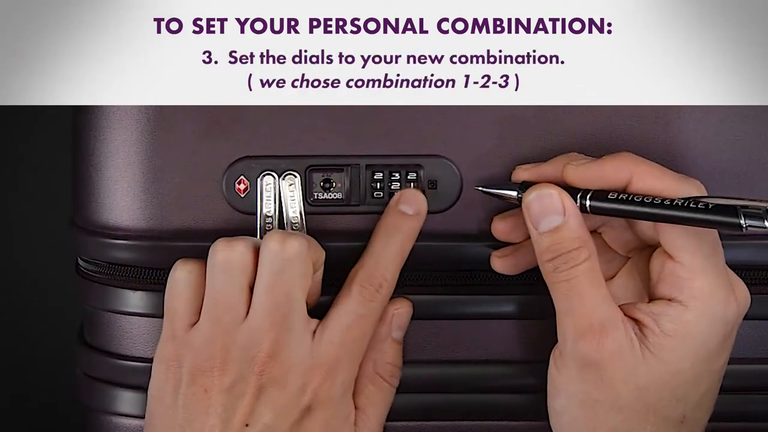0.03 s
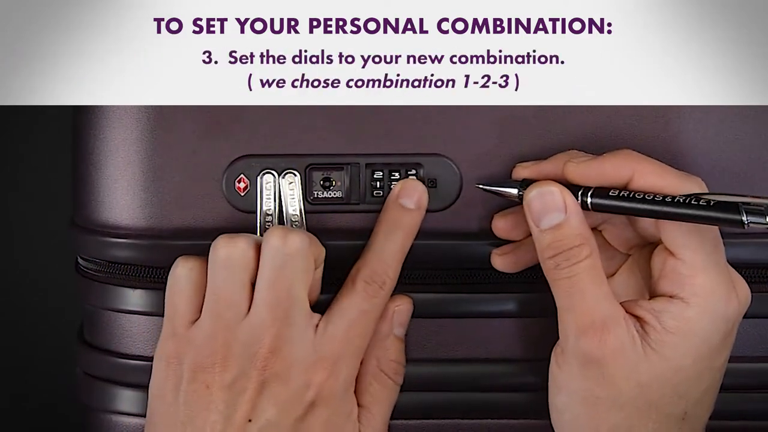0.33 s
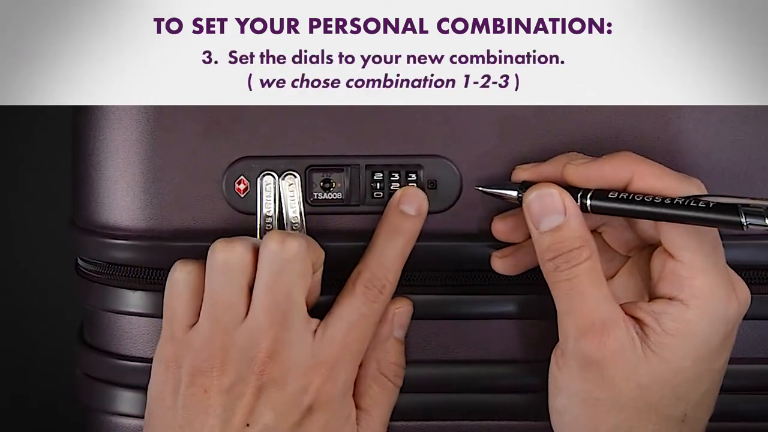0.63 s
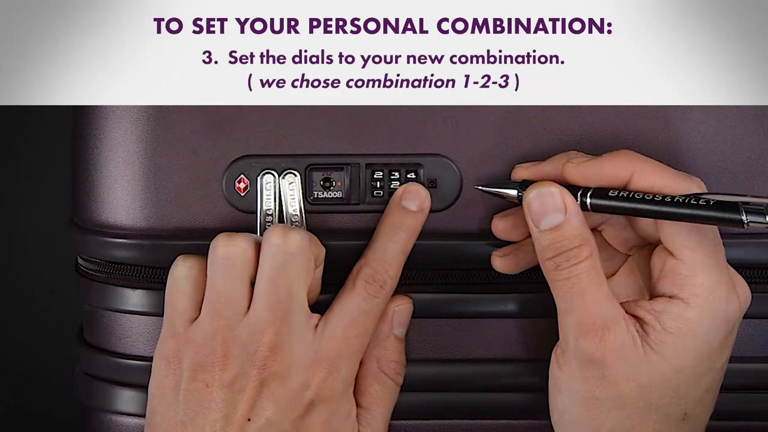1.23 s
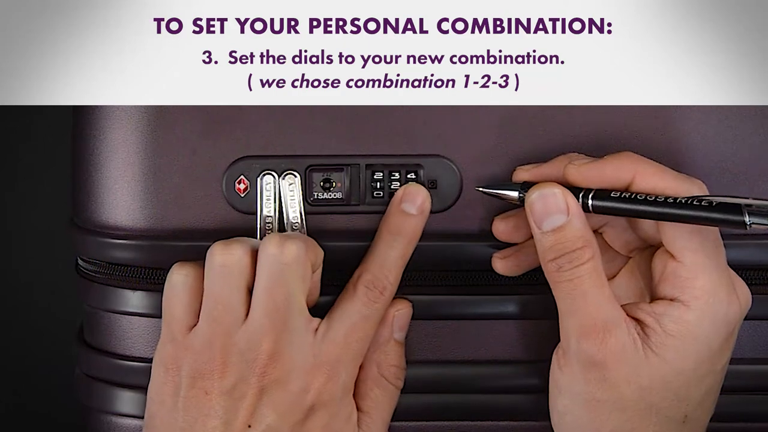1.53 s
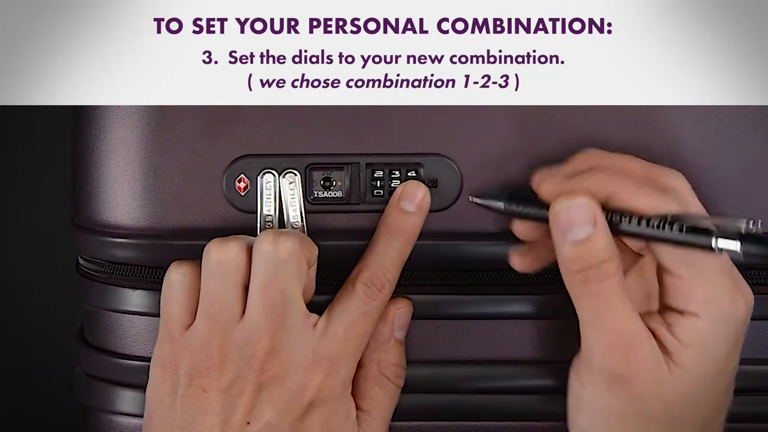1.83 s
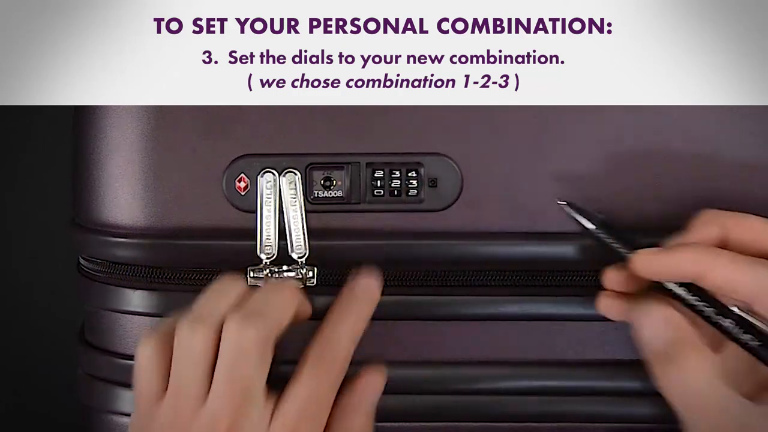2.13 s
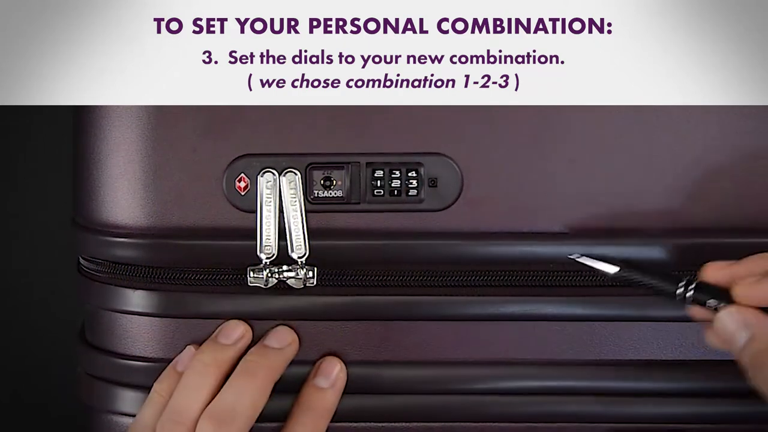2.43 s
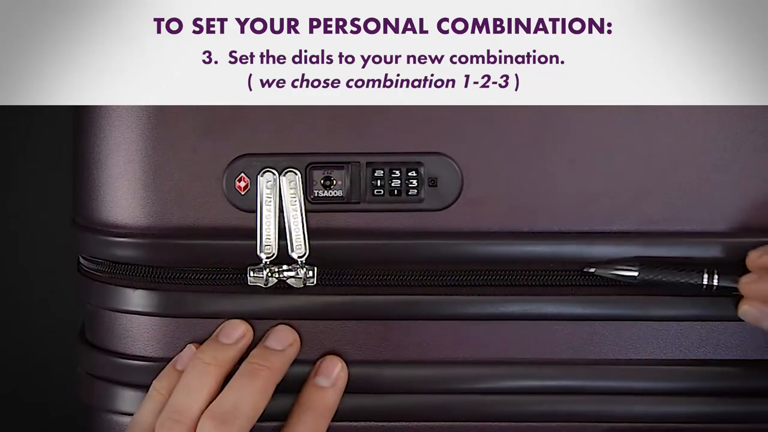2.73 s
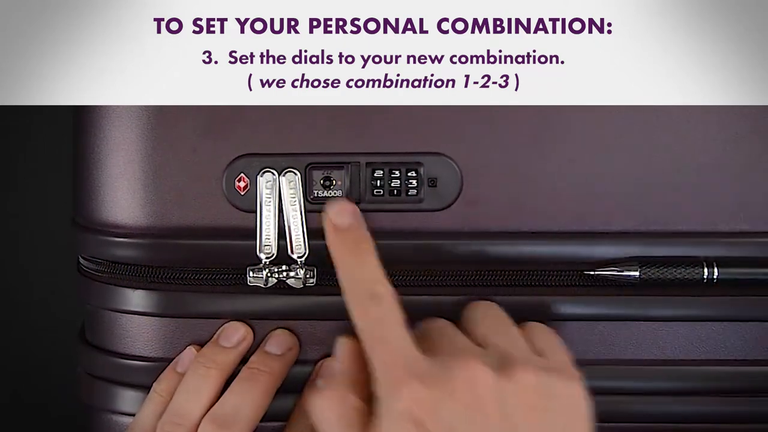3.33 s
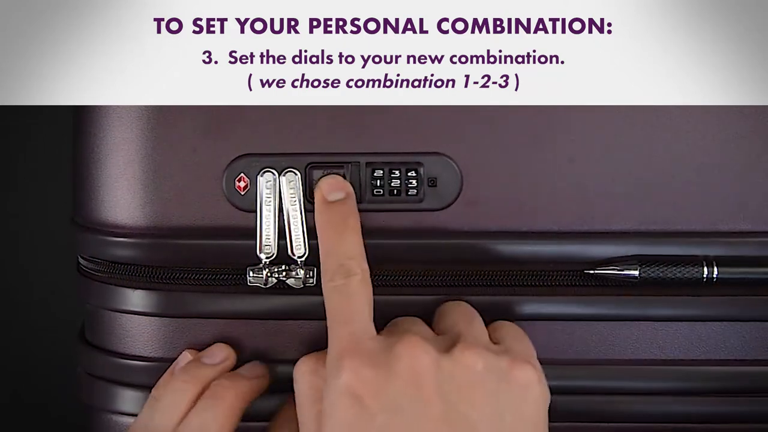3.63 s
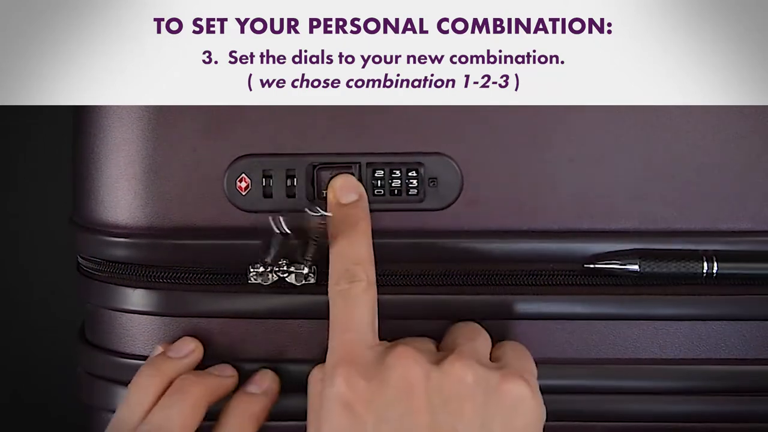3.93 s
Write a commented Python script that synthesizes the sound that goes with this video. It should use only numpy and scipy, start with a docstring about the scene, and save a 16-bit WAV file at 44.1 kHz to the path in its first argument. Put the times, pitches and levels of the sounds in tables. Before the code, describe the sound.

A suitcase lock's loud clack is the main sound, heard close in a small room. First a combination dial clicks lightly at about 0.5 and 1.2 seconds. Fingers brush the shell around 2 seconds. From 2.5 to 3 seconds, zip pulls tick and a pen lands with a soft hollow thump. Near 3.9 seconds the button snaps in a quick double clack with a brief spring rattle, over faint ventilation hum.

```python
"""Two small clicks, close in a small room: a finger turns a suitcase's combination dial two notches.
Skin brushes off the hard shell, zip pulls tick, and a pen is laid on the hollow case, which thumps.
Then the lock button is pressed: button and bolt hit their stops in a loud double clack and a spring rattles.
Faint ventilation noise and mains hum lie underneath."""
import sys
import numpy as np
from scipy import signal
from scipy.fft import rfft, irfft
from scipy.io import wavfile

SR = 44100
rng = np.random.default_rng(int(sys.argv[2]) if len(sys.argv) > 2 else 0)


def waveform_to_disk(signal):
    """Save audio, clipped to [-1, 1], as 16-bit WAV at the path in sys.argv[1]."""
    frames = np.transpose(np.atleast_2d(signal))
    scaled = np.clip(frames, -1, 1) * 32767
    samples = np.round(scaled).astype(np.int16)
    wavfile.write(sys.argv[1], SR, samples)


N = 176400
T = np.arange(N) / SR

# button and bolt impacts (time [s], level [dB], rise [s], t60 [s], bass [dB], treble [dB])
CLACKS = [(3.849, 1.5, 0.00201, 0.0099, -3, -9), (3.8516, 18, 0.00227, 0.031, -0.5, 0),
          (3.8678, -6, 0.00092, 0.048, 9, 0), (3.8839, 18, 0.00086, 0.055, 0.5, 7.5)]
# lock contact spectrum (frequency [Hz], gain [dB])
CLACK_COLOUR = [(60, -52), (130, -39), (200, -6.5), (320, -11.5), (430, -3.5), (600, -11), (900, 3),
                (1350, 3), (2200, -1.5), (3000, 0.5), (4500, -2.5), (5800, 0.5), (7600, -10), (9000, -17),
                (13000, -30), (16000, -47)]
# housing and panel modes (frequency [Hz], level [dB], t60 [s])
HOUSING_MODES = [(190, -64, 0.57), (842, -56, 0.26), (935, -54.5, 0.6), (1054, -50, 0.18),
                 (1370, -36, 0.017), (1944, -35, 0.029), (2660, -39, 0.045), (2860, -32.5, 0.019)]
# button and well modes (frequency [Hz], level [dB], t60 [s])
BUTTON_MODES = [(420, -27.5, .11), (1407, -17, 0.054), (1847, -20, 0.058), (3080, -16, 0.045)]
# bolt modes (frequency [Hz], level [dB], t60 [s])
BOLT_MODES = [(5420, -18, 0.024), (6020, -13, 0.025)]

def button():
    """The button slides in and snaps against its stop; the bolt follows and seats."""
    slide_s, stop_s, seat_s, slide_db = 3.82, 3.8525, 3.888, -47
    out = np.zeros(N)
    push = np.linspace(0, 1, int((CLACKS[0][0] - slide_s) * SR))
    friction = push * rng.standard_normal(len(push))
    add(out, slide_s, amp(slide_db) * colour(friction, CLACK_COLOUR))
    for at, db, rise_s, t60_s, bass_db, treble_db in CLACKS:
        contact = colour(crack(rise_s, t60_s), CLACK_COLOUR)
        tilt = [(550, bass_db), (900, 0), (4000, 0), (11000, treble_db)]
        add(out, at, amp(db) * colour(contact, tilt))
        add(out, at + rise_s, amp(db) * ring(HOUSING_MODES))
    add(out, stop_s, ring(BUTTON_MODES))
    add(out, seat_s, ring(BOLT_MODES))
    return out


# spring contacts (time [s], level [dB])
RATTLES = [(3.885, 4), (3.8928, -9), (3.9001, 3.5), (3.9046, 2.5), (3.931, -4.5)]
# spring modes (frequency [Hz], level [dB], t60 [s])
SPRING_MODES = [(7610, -34, 0.036), (7716, -20.5, 0.037), (11120, -26.5, 0.015), (14900, -26.5, 0.044)]

def spring():
    """The released spring rattles, ringing at each contact."""
    out = np.zeros(N)
    for at, db in RATTLES:
        ringing = ring(SPRING_MODES, scatter=0.0069)
        chatter = amp(-8) * colour(crack(rise_s=0.00035, t60_s=0.05), CLACK_COLOUR)
        add(out, at, amp(db) * (ringing + chatter))
    return out


# dial notches (time [s], snap level [dB], body level [dB], lift lead [s])
NOTCHES = [(0.4542, 1, -54.5, .0024), (1.2214, 3.5, -45, .0015)]
# hollow dial modes (frequency [Hz], level [dB], t60 [s])
DIAL_MODES = [(1360, 5.5, 0.019), (2100, 1.5, .009)]
# detent spectrum (frequency [Hz], gain [dB])
DETENT_COLOUR = [(300, -50), (1000, -27.5), (2700, -24), (3650, -28), (4000, -15), (4600, -9), (5100, -1.5),
                 (5600, -4), (6100, -15), (7400, -25), (8100, -43), (12000, -57)]

def dial():
    """The detent lifts, snaps into the next notch and chatters; the hollow dial knocks with it."""
    settle_lag_s = 0.001217
    drag_s, drag_width_s, drag_db = 1.935, 0.04, -47.5
    snaps, body = np.zeros(N), np.zeros(N)
    for at, db, body_db, lead_s in NOTCHES:
        add(snaps, at - lead_s, amp(db - 9) * crack(rise_s=0.00013, t60_s=0.0047))
        add(snaps, at, amp(db) * np.ones(1))
        add(snaps, at + settle_lag_s, amp(db - 8.5) * crack(rise_s=0.0003, t60_s=0.016))
        add(body, at - lead_s, amp(body_db) * ring(DIAL_MODES, scatter=0.01))
    # finger drags on the wheel without turning it
    drag = amp(drag_db) * np.exp(-((T - drag_s) / drag_width_s) ** 2) * rng.standard_normal(N)
    return colour(snaps + drag, DETENT_COLOUR) + body


# pen touches, lands, settles (time [s], level [dB], treble [dB])
PEN_HITS = [(2.7102, -28.5, -15), (2.8926, -6.5, 2), (2.9134, -15.5, -9), (3.0167, -24.5, -6.5)]
# pen contact spectrum (frequency [Hz], gain [dB])
PEN_COLOUR = [(100, 11), (400, -4), (1100, 4), (2000, -0.5), (3200, 0), (5500, -3.5), (6800, -4.5),
              (7800, -12), (10000, -12.5), (15500, -25)]
# modes of pen and shell beneath (frequency [Hz], level [dB], t60 [s])
PEN_MODES = [(1210, -39, 0.013), (1670, -32, 0.023), (5330, -31, 0.0086), (9950, -53, 0.038)]

def pen():
    """The pen barrel cracks against the shell and its clip rings; softer touches are duller."""
    out = np.zeros(N)
    for at, db, treble_db in PEN_HITS:
        hit = colour(strike(grit_db=0, t60_s=0.022), PEN_COLOUR) + ring(PEN_MODES)
        add(out, at, amp(db) * colour(hit, [(1200, 0), (9000, treble_db)]))
    return out


# soft blows on the shell (time [s], level [dB], pitch [ratio])
THUMPS = [(2.526, -39, 0.79), (2.553, -40, 0.82), (2.583, -47, 0.95), (2.737, -49.5, .95), (2.892, -29, 1),
          (2.919, -31.5, 1.1), (3.017, -43, 1.3)]
# shell modes at pitch 1 (frequency [Hz], level [dB], t60 [s])
SHELL_MODES = [(82.8, -13.5, 0.54), (98, -7.5, 0.21), (156.6, 1, 0.13), (185, 2, 0.065), (262.6, -8.5, 0.2),
               (328, -15, 0.17)]

def shell():
    """The hollow case booms under hand or pen; gentle blows barely reach its upper modes."""
    dulling_db_per_db = 0.86
    hardest_db = max(db for at, db, pitch in THUMPS)
    out = np.zeros(N)
    for at, db, pitch in THUMPS:
        tilt = [(170, 0), (300, dulling_db_per_db * (db - hardest_db))]
        add(out, at, -amp(db) * colour(ring(SHELL_MODES, pitch), tilt))
    return colour(out, [(55, -21), (85, -2.5), (280, -2), (600, -22), (3000, -46)])


# zip pull and pen ticks (time [s], level [dB], centre [Hz], width [exponent])
TICKS = [(2.5239, -14.5, 6100, 1.28), (2.6507, -16, 5570, 1.06), (2.6653, -26, 6000, 0.83),
         (2.7163, -41, 14100, 0.77), (2.7203, -13.5, 5770, 0.83), (2.931, -18, 6400, .8),
         (3.0157, -24.5, 5640, 0.56)]
# tick spectrum at width 1 (frequency / centre [ratio], gain [dB])
TICK_COLOUR = [(.1, -21), (.76, -10), (.88, 4), (1, 3), (1.13, 0), (1.3, -14.5), (2.7, -48)]

def metal_ticks():
    """Small metal parts touch: a sharp contact and brief grind through a bright resonance."""
    out = np.zeros(N)
    for at, db, centre_hz, width in TICKS:
        resonance = [(centre_hz * ratio ** width, gain_db) for ratio, gain_db in TICK_COLOUR]
        add(out, at, amp(db) * colour(strike(grit_db=-2.5, t60_s=0.017), resonance))
    return out


# fingertip brushes (time [s], level [dB], resonance [Hz])
BRUSHES = [(1.7831, -38.5, 4500), (1.914, -29.5, 5400), (1.9583, -36, 3400), (2.0348, -34.5, 3520),
           (2.051, -24.5, 5800), (2.0625, -20, 3020)]
# brush spectrum (frequency [Hz], gain [dB])
BRUSH_COLOUR = [(800, -4.5), (1300, 10), (2200, -5), (3100, 5), (5900, 4.5), (7500, -9), (15000, -41)]
# skin rub envelope (time [s], level [dB])
RUB_LEVELS = [(1.75, -78), (1.79, -67.5), (1.87, -70), (2.01, -64.5), (2.15, -69.5), (2.3, -65.5),
              (2.45, -75), (2.7, -64.5), (2.85, -75)]
# skin rub spectrum (frequency [Hz], gain [dB])
RUB_COLOUR = [(300, 6), (1400, -3.5), (3050, -4.5), (5800, -2.5), (7200, -11), (14000, -35)]

def fingers():
    """Skin rubs the shell and flicks the dials; each spot has its own plastic resonance."""
    peak_db, width_ratio = 6.5, 1.21
    grain_db, grain_samples = 2.3, 100
    flicks = np.zeros(N)
    for at, db, hz in BRUSHES:
        resonance = [(hz / width_ratio, 0), (hz, peak_db), (hz * width_ratio, 0)]
        add(flicks, at, amp(db) * colour(crack(rise_s=0.0002, t60_s=0.029), resonance))
    noise = rng.standard_normal(N)
    roughness_db = grain_db * np.repeat(rng.standard_normal(N // grain_samples + 1), grain_samples)[:N]
    rub = unit(colour(noise * amp(roughness_db), RUB_COLOUR)) * np.sqrt(N)
    rub_db = np.interp(T, *np.array(RUB_LEVELS).T, left=-120, right=-120)
    return colour(flicks, BRUSH_COLOUR) + amp(rub_db) * rub


# ventilation spectrum (frequency [Hz], gain [dB])
AIR_COLOUR = [(25, -37), (45, -21.5), (90, -9), (120, -7.5), (145, -16), (230, -8), (520, -9), (1100, -13),
              (2000, -19.5), (3100, -25.5), (4000, -25.5), (6900, -30.5), (7500, -36), (15500, -39.5)]

def background():
    """Steady ventilation noise and mains hum."""
    air_db, hum_db, hum_hz = -61.5, -68.5, 120
    air = unit(colour(rng.standard_normal(N), AIR_COLOUR)) * np.sqrt(N)
    hum = np.sqrt(2) * np.sin(2 * np.pi * hum_hz * T)
    return amp(air_db) * air + amp(hum_db) * hum


# echo spectrum (frequency [Hz], gain [dB])
ECHO_COLOUR = [(60, -5.5), (200, 7.5), (1000, -0.5), (3000, -2), (7000, -4.5), (10000, -5), (15000, -16.5)]

def diffuse_echo(t60_s, treble_t60_s):
    """Impulse response of an enclosed space: dense reflections build, then decay in two bands."""
    split_hz, gap_s, build_s = 5000, 0.0009, 0.011
    low = butter(rng.standard_normal(SR // 2), 2, split_hz, "low") * fade(t60_s)
    high = butter(rng.standard_normal(SR // 2), 2, split_hz, "high") * fade(treble_t60_s)
    build = np.clip((T[:SR // 2] - gap_s) / build_s, 0, 1)
    return colour(unit(build * (low + high)), ECHO_COLOUR)


def placed(x, echo, wet_db):
    """Direct sound plus its echo."""
    return x + amp(wet_db) * signal.fftconvolve(x, echo)[:N]


def strike(grit_db, t60_s):
    """One hard contact followed by a burst of finer ones."""
    x = amp(grit_db) * crack(0.00047, t60_s)
    x[0] += 1
    return x


def crack(rise_s, t60_s):
    """A dense, spectrally even burst of tiny contacts that builds and dies away."""
    t = T[:SR // 2]
    envelope = np.minimum(t / rise_s, 1) * np.exp(-np.log(1000) * np.maximum(t - rise_s, 0) / t60_s)
    spectrum = rfft(rng.standard_normal(len(t)) * envelope)
    whitened = irfft(spectrum / (abs(spectrum) + 1e-12), len(t))
    return unit(whitened * np.sqrt(envelope))


def ring(modes, pitch=1, scatter=0):
    """Damped modes after one blow; scatter detunes each at random."""
    detunes = 1 + scatter * rng.standard_normal(len(modes))
    return sum(amp(db) * fade(t60_s) * np.sin(2 * np.pi * hz * pitch * detune * T[:SR // 2])
               for (hz, db, t60_s), detune in zip(modes, detunes))


def fade(t60_s):
    """Half a second of exponential decay."""
    return np.exp(-np.log(1000) * T[:SR // 2] / t60_s)


def colour(x, points, size=4096):
    """Minimum-phase filter through (frequency [Hz], gain [dB]) points."""
    hz, db = np.array(points).T
    bin_hz = np.arange(size // 2 + 1) * SR / size
    gain = amp(np.interp(np.log(bin_hz + 1), np.log(hz), db))
    cepstrum = irfft(np.log(gain))
    cepstrum[1:size // 2] *= 2
    cepstrum[size // 2 + 1:] = 0
    response = irfft(np.exp(rfft(cepstrum)))
    return signal.fftconvolve(x, response)[:len(x)]


def butter(x, order, hz, kind):
    """Low- or high-pass filter."""
    return signal.sosfilt(signal.butter(order, hz, kind, fs=SR, output="sos"), x)


def amp(db):
    """Decibels to gain."""
    return 10 ** (np.asarray(db) / 20)


def unit(x):
    """Scale to unit energy."""
    return x / np.sqrt(np.sum(x ** 2))


def add(out, at, x):
    """Mix x in at a time in seconds."""
    i = int(at * SR)
    out[i:i + len(x)] += x[:N - i]


def scene():
    """Mono mix: handling echoes in the room; the lock sets the whole hollow case ringing."""
    room = diffuse_echo(t60_s=0.31, treble_t60_s=0.25)
    cavity = diffuse_echo(t60_s=0.59, treble_t60_s=0.54)
    handling = placed(dial() + fingers(), room, wet_db=-1.5) + placed(metal_ticks(), room, wet_db=-4.5)
    knocks = placed(shell(), room, wet_db=-15.5) + placed(pen(), room, wet_db=-0.5)
    lock = placed(button() + spring(), cavity, wet_db=-2.5)
    lock = butter(lock, 4, 150, "high")  # the lock sounds carry little bass below 150 Hz
    return (handling + knocks + lock + background())[None]


def record(dry):
    """The recorder rounds the loudest peaks and cuts the rumble and the top."""
    ceiling, low_cut_hz, top_hz = 0.55, 44.5, 15900
    rounded = ceiling * np.tanh(dry / ceiling)
    top_cut = signal.ellip(8, 0.2, 70, top_hz, fs=SR, output="sos")
    return signal.sosfilt(top_cut, butter(rounded, 3, low_cut_hz, "high"))


dry = scene()
out = record(dry)
waveform_to_disk(out)
```